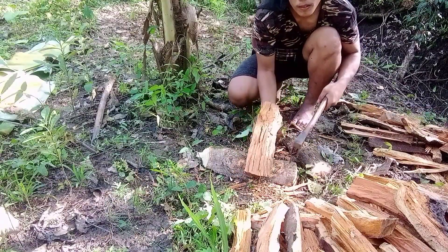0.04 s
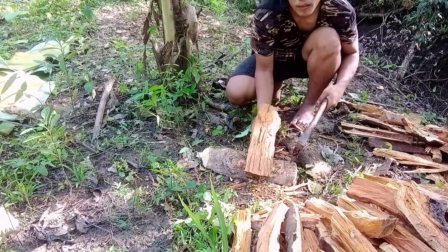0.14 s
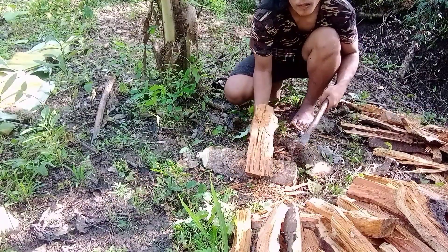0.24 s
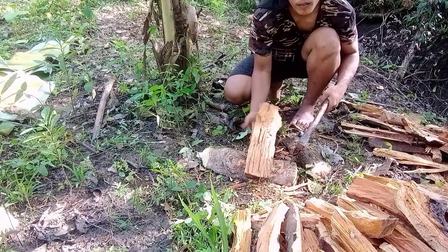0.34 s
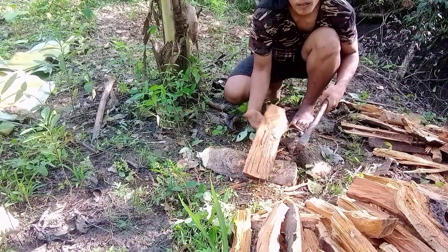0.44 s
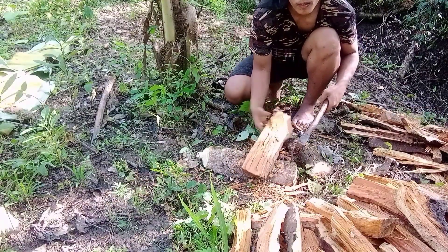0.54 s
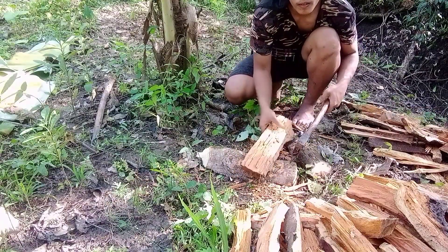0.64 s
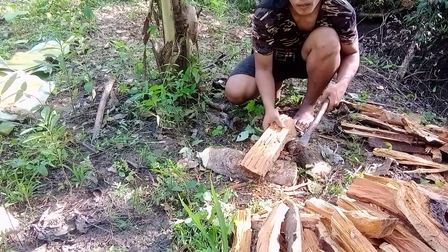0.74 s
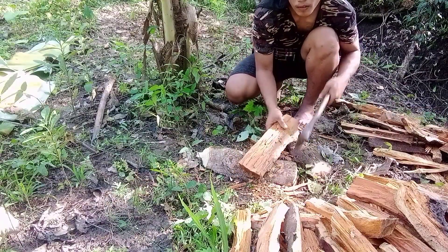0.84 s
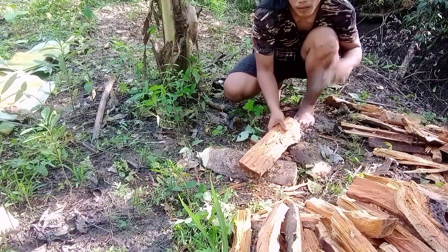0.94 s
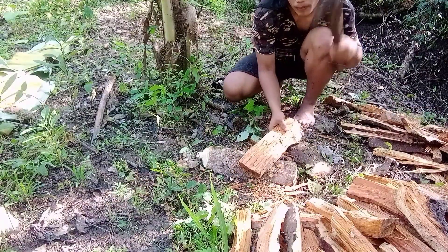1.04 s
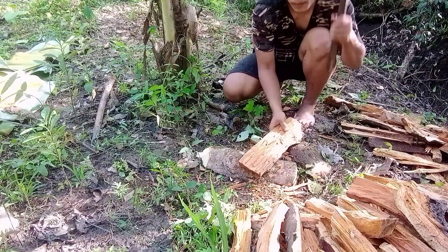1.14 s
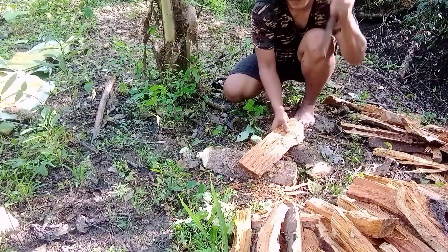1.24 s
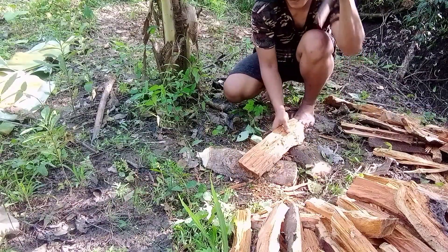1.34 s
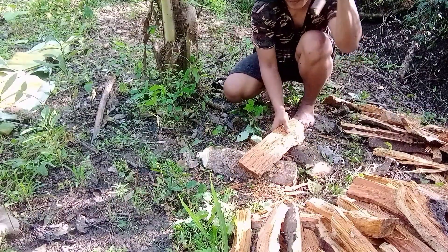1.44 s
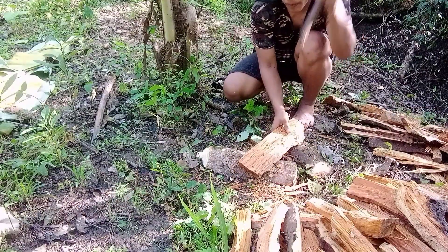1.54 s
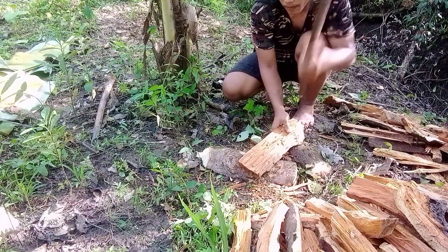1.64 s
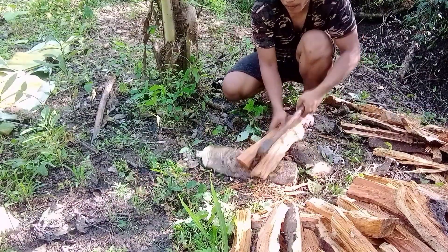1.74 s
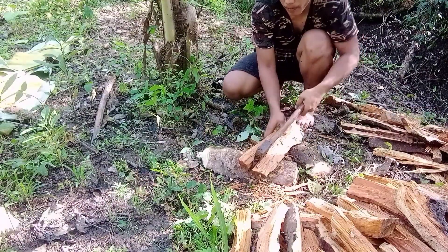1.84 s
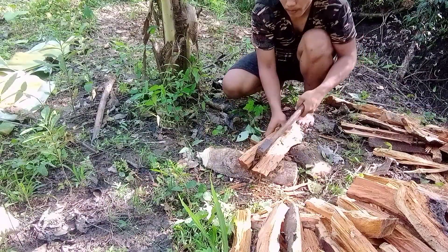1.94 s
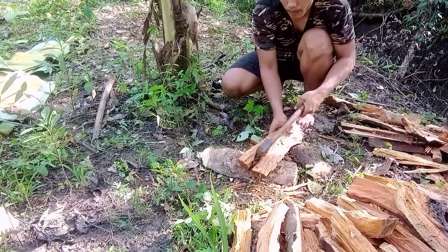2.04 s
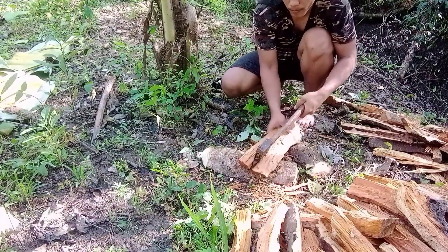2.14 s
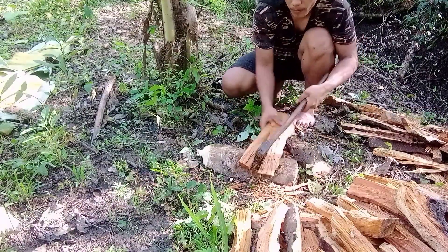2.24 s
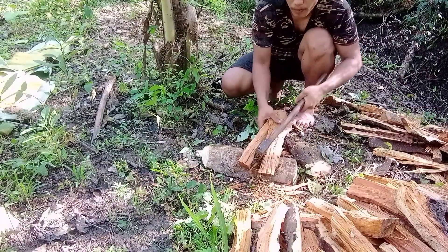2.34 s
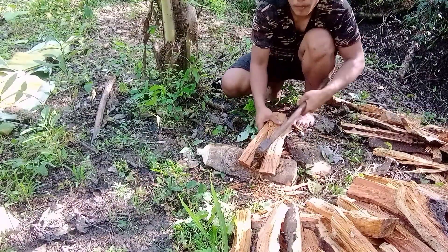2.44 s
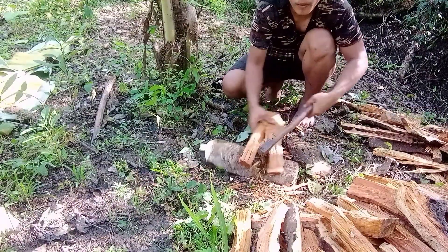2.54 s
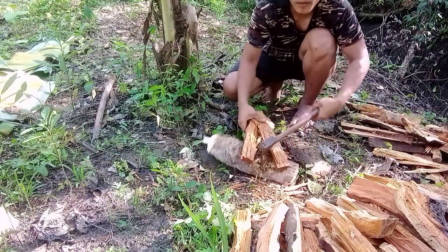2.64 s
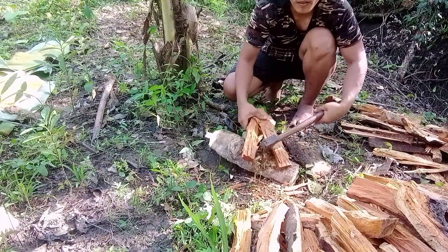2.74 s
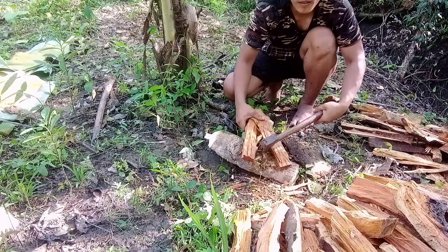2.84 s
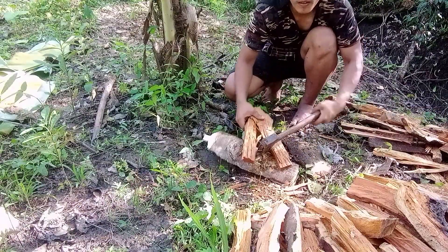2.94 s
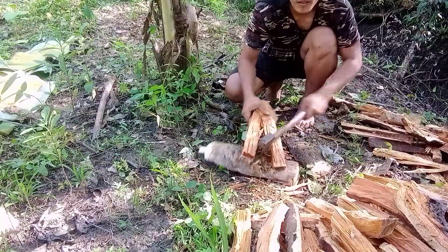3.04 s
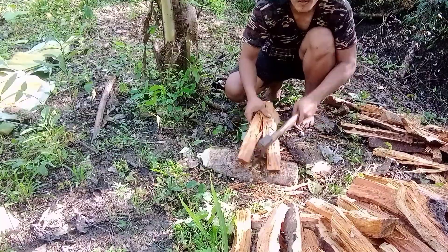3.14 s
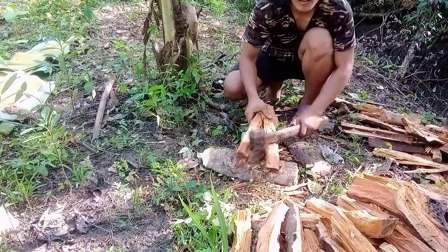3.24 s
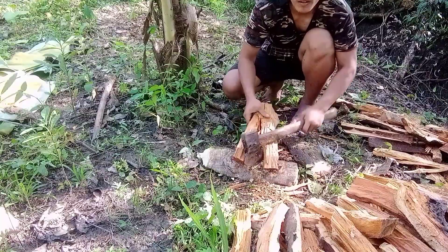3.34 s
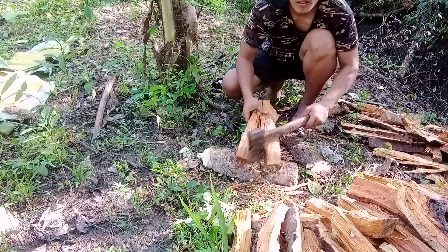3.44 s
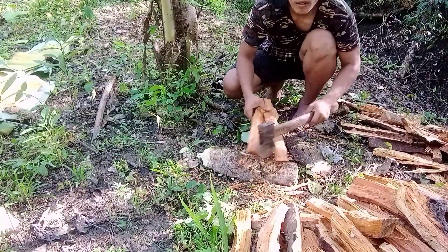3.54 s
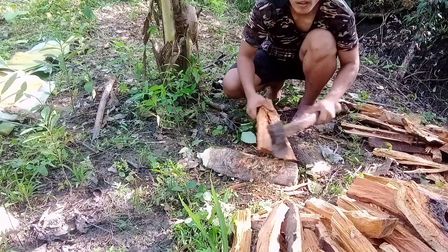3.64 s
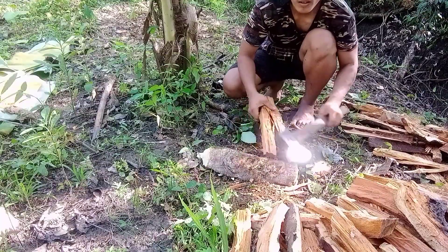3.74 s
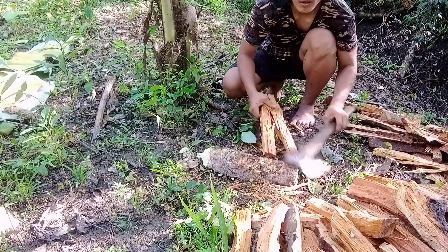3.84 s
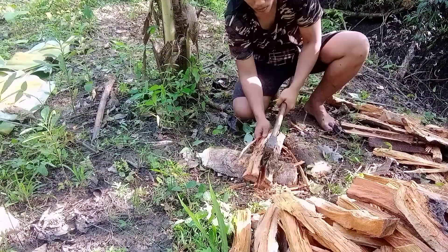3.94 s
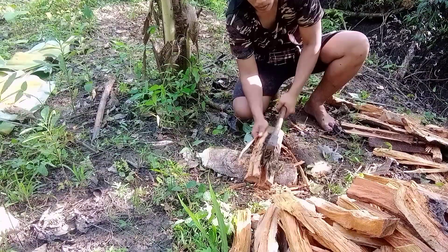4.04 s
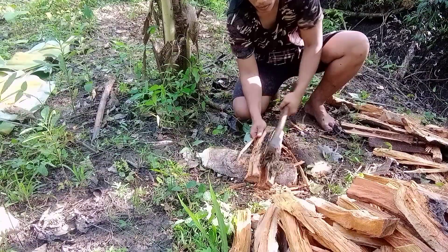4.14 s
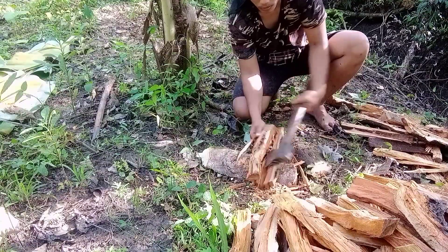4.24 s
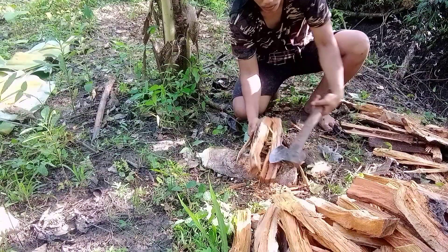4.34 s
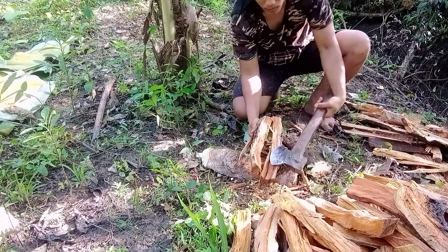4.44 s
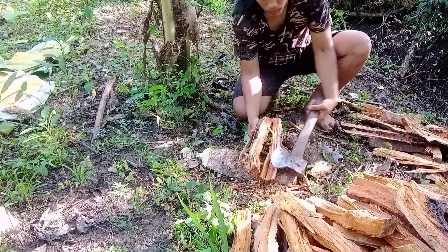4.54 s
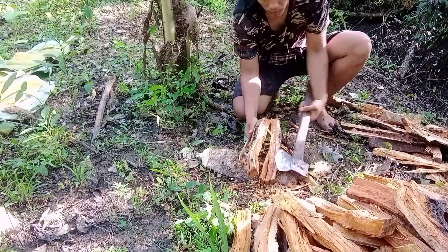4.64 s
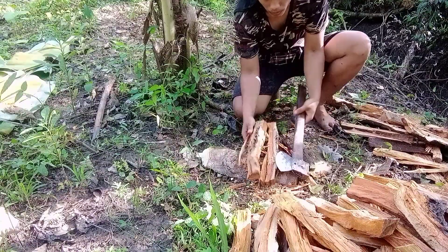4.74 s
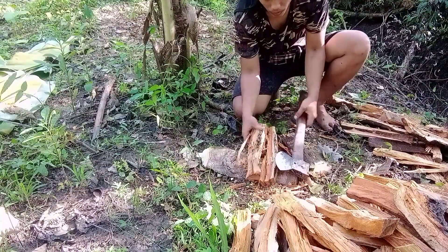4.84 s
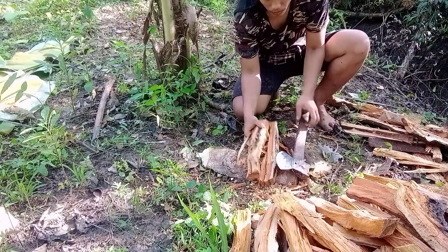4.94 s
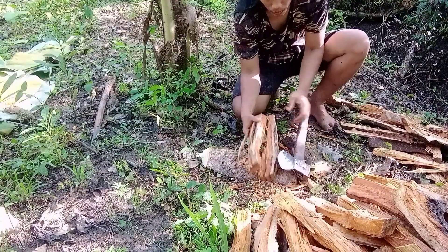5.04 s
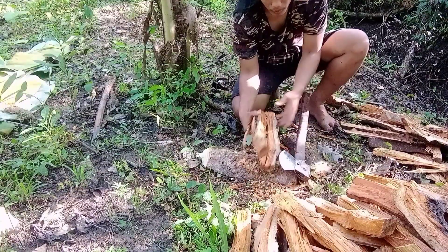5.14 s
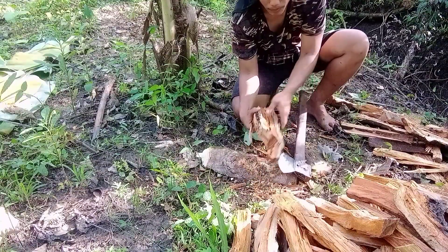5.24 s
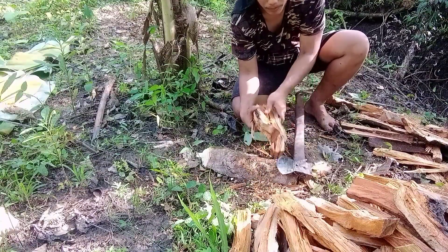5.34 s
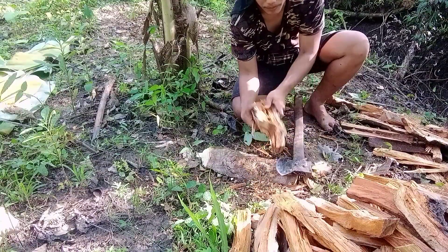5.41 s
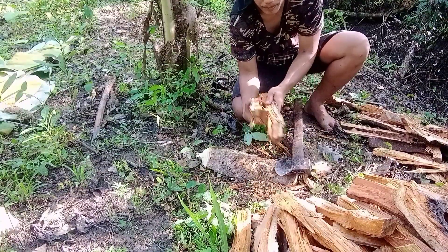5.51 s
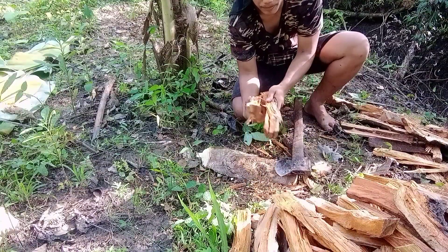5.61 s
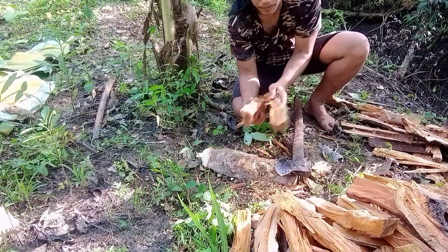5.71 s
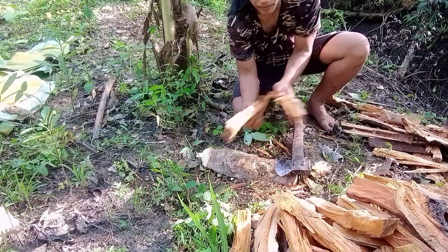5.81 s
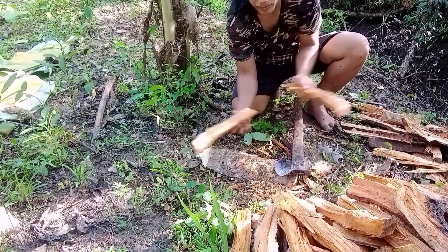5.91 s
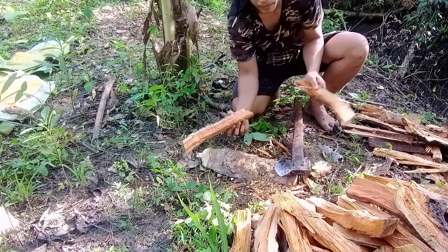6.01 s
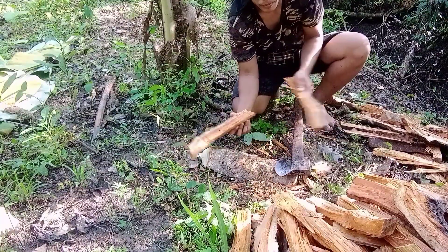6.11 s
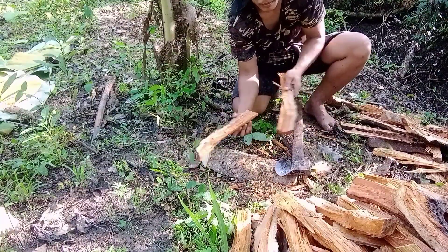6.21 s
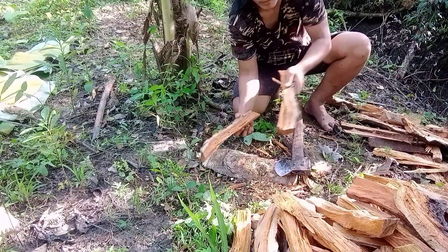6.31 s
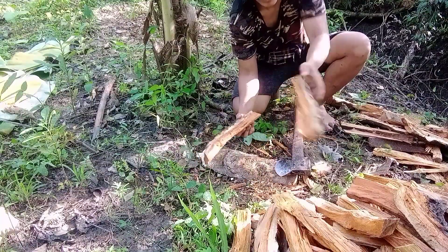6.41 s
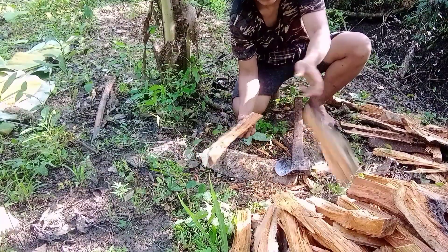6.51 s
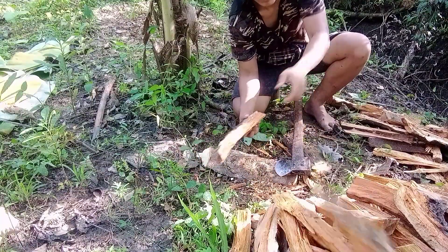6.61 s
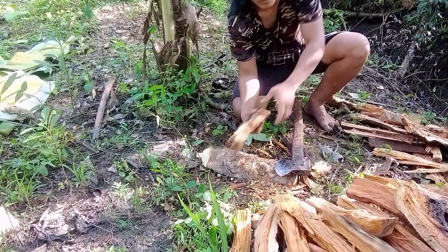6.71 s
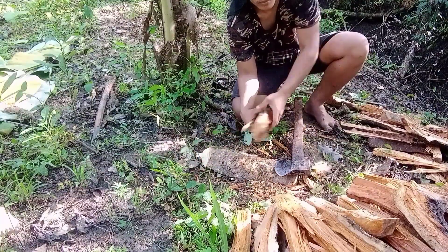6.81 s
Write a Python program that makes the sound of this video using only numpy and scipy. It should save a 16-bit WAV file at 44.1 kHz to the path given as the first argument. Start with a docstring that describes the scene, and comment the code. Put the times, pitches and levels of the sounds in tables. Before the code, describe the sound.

A clearing among trees, with the microphone close to the wood. Crickets and cicadas keep a thin high drone with pulsing trills and chirps over faint low rumble and hiss. In the first second there is light rubbing, a soft thump, short gliding whistles from a far bird, and distant chops with an airy echo at about 0.7 and 1.6. At 1.8 one loud, dry axe blow cracks into the wood, with a short echo. A small snap follows at 2.1, then dense splintering and tearing from 2.3 to 3.3, ending in woody knocks. Another distant chop comes at 3.5. More fibres crackle and rip from 4.1 to 4.45. The axe head settles with faint clinks at 4.75 and 5.0. Quiet rustles and small ticks follow, a light knock at 5.9, then a sharp bright clack as a piece lands on the pile at 6.74.

```python
"""Splitting firewood among trees

Near the microphone a small axe splits firewood on a log: one hard chop, tearing fibres, knocks, the axe head
set down, a piece tossed on the pile. Breaks and rubbing are shaped noise; knocks and steel are damped sines.
Someone farther off chops too, mostly heard as echo: noise tails that die away between the trunks.
Crickets and cicadas drone as pulsed tones and coloured noise, a far bird whistles in gliding sines,
and low rumble and faint hiss lie underneath."""
import sys
import numpy as np
from scipy import signal
from scipy.fft import rfft, irfft, next_fast_len
from scipy.io import wavfile
from scipy.ndimage import uniform_filter1d, map_coordinates

SR = 44100
rng = np.random.default_rng(int(sys.argv[2]) if len(sys.argv) > 2 else 0)


def volts_from_db(level):
    """Convert decibel levels to linear amplitude ratios."""
    exponent = np.asarray(level, float) / 20
    return 10 ** exponent


def persist_wave(psi):
    """Save psi, clipped to +-1, as 16-bit WAV."""
    counts = np.round(np.clip(psi, -1, 1) * 32767).astype(np.int16)
    wavfile.write(sys.argv[1], SR, np.atleast_2d(counts).T)


N = 302967
T = np.arange(N) / SR

# echo among the trees: (frequency [Hz], time to fall 60 dB before any stretching [s])
TREE_DECAY = [(150, 0.43), (1000, 0.53), (4000, 0.52), (9000, .4), (15000, 0.15)]
# far chops: (time [s], level [dB], echo relative to it [dB], brightness [dB per octave])
FAR_CHOPS = [(0.673, -30.5, -3, -2.06), (1.649, -34.5, -2, 0.1), (3.523, -26, -7.5, 1.9),
             (3.94, -56, 2, 1.5)]
# a far chop still echoing at the start: (time before the start [s], level [dB], echo [dB], brightness [dB per octave])
EARLIER_CHOP = (.2, -26.5, 1.5, -2)
# spectrum of far chops before brightness: (frequency [Hz], relative level [dB])
FAR_COLOUR = [(88, -33), (150, 1), (303, -26.5), (398, -15), (466, -5.5), (649, -4.5), (1140, -4),
              (4160, -7), (6910, -6.5), (16000, -42.5)]
# cicada chorus: (time [s], cicada level [dB], low cicada level [dB])
CHORUS_LEVEL = [(0.0, -70, -83), (0.15, -71, -84), (0.52, -71, -94), (0.86, -72.5, -95), (0.99, -69, -99),
                (1.26, -68, -112.5), (1.55, -68, -103), (1.68, -73.5, -91), (1.84, -65.5, -78),
                (2.31, -69, -72.5), (2.58, -65.5, -93), (2.7, -61.5, -80), (2.85, -69, -80),
                (3.06, -67.5, -81), (3.19, -74, -75.5), (3.33, -72, -79), (3.56, -71, -82),
                (3.71, -69, -78), (3.94, -75, -83.5), (4.15, -68.5, -91), (4.3, -69, -69), (4.53, -70, -84),
                (4.69, -66, -80), (4.97, -69, -79.5), (5.36, -69, -79), (5.74, -66, -76),
                (5.89, -69.5, -75.5), (6.08, -69.5, -86), (6.28, -71, -87), (6.5, -71.5, -80.5),
                (6.87, -71, -90.5)]
# spectrum of the cicadas: (frequency [Hz], relative level [dB])
CICADA_COLOUR = [(4300, -58), (5100, -24), (5500, -6), (5900, 3), (6500, -6), (7050, -18.5), (7500, -12),
                 (8000, -15.5), (8350, -10.5), (8750, -15), (9150, -42), (11000, -79.5)]
# spectrum of the low cicadas: (frequency [Hz], relative level [dB])
LOW_CICADA_COLOUR = [(4100, -50), (4450, -6), (4800, 0), (5300, -3), (5800, -19.5), (6500, -60)]
# phrases of the trilling cricket: (time [s], level [dB])
TRILL_LEVEL = [(0, -70), (.15, -72), (.22, -84), (.8, -87.5), (.95, -70), (1.62, -72), (1.75, -79),
               (2.4, -82), (2.5, -71), (3.55, -71), (3.75, -76), (3.9, -87), (4.3, -82), (4.45, -69.5),
               (4.85, -76.5), (4.95, -84), (5.3, -89), (5.42, -70), (6.1, -72), (6.87, -68)]
# distant rumble: (time [s], relative level [dB])
RUMBLE_LEVEL = [(0.0, -79), (0.38, -81), (0.63, -81.5), (0.86, -75.5), (1.03, -75.5), (1.2, -78.5),
                (1.49, -74.5), (1.68, -76), (1.82, -69), (1.87, -67), (2.35, -75.5), (2.62, -82),
                (2.79, -71.5), (2.93, -78), (3.52, -80.5), (3.67, -71.5), (4.0, -81), (4.32, -77.5),
                (4.75, -82), (5.24, -82), (5.45, -82.5), (6.05, -86.5), (6.79, -80), (6.87, -91)]
# spectrum of the rumble: (frequency [Hz], relative level [dB])
RUMBLE_COLOUR = [(20, -29.5), (40, -8), (100, 0), (200, -10), (330, -23), (600, -60)]
# spectrum of the faint hiss: (frequency [Hz], relative level [dB])
HISS_COLOUR = [(100, -28.5), (300, 3), (1000, -3.5), (4000, -8), (9000, -6), (11000, -21.5), (16000, -15.5)]
# higher crickets: (middle [s], pitch [Hz], length [s], relative level [dB])
PEEPS = [(0.059, 8470, 0.028, -71.5), (0.146, 8590, 0.11, -80), (0.475, 8520, 0.043, -76.5),
         (0.605, 8620, 0.14, -80), (0.928, 8470, 0.11, -78), (1.05, 8620, .07, -79.5),
         (1.12, 8600, 0.025, -85), (1.162, 8440, 0.041, -86), (1.287, 8900, 0.03, -87),
         (1.31, 8400, 0.082, -83), (1.337, 8520, 0.028, -73.5), (1.357, 8750, 0.034, -88),
         (1.504, 8650, 0.059, -79), (2.146, 8330, 0.12, -80.5), (2.43, 8550, 0.079, -82),
         (2.907, 8620, 0.083, -81), (3.346, 8650, 0.078, -82), (3.862, 8320, .06, -87),
         (4.021, 8620, 0.093, -78.5), (4.27, 8400, .05, -88), (4.534, 8540, .05, -80.5),
         (4.726, 8520, 0.044, -75), (4.968, 8610, 0.055, -79), (5.136, 8660, 0.067, -79.5),
         (5.376, 8560, 0.039, -78.5), (5.53, 8650, 0.035, -75.5), (5.804, 8500, 0.04, -76),
         (5.971, 8370, .06, -81.5), (6.005, 8800, 0.038, -90.5), (6.221, 8570, 0.033, -76.5),
         (6.3, 8600, 0.12, -84), (6.424, 8440, 0.041, -81.5), (6.65, 8600, 0.049, -79.5),
         (6.706, 8900, .05, -91)]
# hands, bark and tearing fibres, one list a stretch: (time [s], relative scrape level [dB], relative leaf level [dB])
RUSTLE_LEVELS = [
    [(0.05, -79, -96), (0.136, -79, -116), (0.2, -87, -98)],
    [(0.31, -82, -99), (0.42, -87, -99)],
    [(0.84, -79, -99), (1.008, -92, -100), (1.1, -101, -100)],
    [(2.2, -84.5, -97), (2.356, -78.5, -94.5), (2.492, -91, -92), (2.576, -72.5, -89), (2.69, -72, -81),
     (2.728, -78, -84), (2.85, -85, -90), (2.92, -87, -99), (3.066, -79, -88), (3.178, -71.5, -90.5),
     (3.216, -67.5, -93), (3.31, -76, -100), (3.352, -96, -102), (3.45, -113, -93)],
    [(4.05, -97, -105.5), (4.154, -64, -99), (4.28, -75.5, -94), (4.33, -69.5, -78), (4.446, -62, -91),
     (4.524, -82, -106), (4.748, -94, -105), (4.974, -91.5, -99), (5.2, -88.5, -102)],
    [(5.45, -98, -99), (5.57, -89, -99), (5.69, -105, -95), (5.786, -91, -91.5), (5.94, -88, -94),
     (6.0, -113, -99)],
    [(6.26, -91, -101), (6.4, -101, -100), (6.54, -95, -100)],
    [(6.72, -89.5, -100), (6.87, -94.5, -99)],
]
# spectrum of the scrape: (frequency [Hz], relative level [dB])
SCRAPE_COLOUR = [(180, -93), (300, -69), (689, -23), (978, -2), (1300, -12.5), (1840, -6), (3950, -7.5),
                 (6850, -5), (16000, -29)]
# spectrum of the dry leaves: (frequency [Hz], relative level [dB])
LEAF_COLOUR = [(4000, -22), (6500, -3), (9000, 3), (12000, -8.5), (16000, 2)]
# bouts of the chirping cricket: (middle of first chirp [s], chirps [count], period [s], level [dB])
BOUTS = [(.13, 5, 0.17, -79.5), (0.939, 5, .163, -69), (2.157, 7, 0.18, -65), (3.895, 1, 0.21, -63),
         (4.554, 10, .164, -65), (6.234, 3, 0.18, -74)]
# near breaks: (time [s], snap level [dB], then relative to it knock [dB], treble [dB], air [dB]; 30 dB fall [ms])
CRACKS = [(0.1027, -57.5, -6, -8, -30, 14), (0.1526, -55, -1, 1, -27, 8), (0.955, -51, -3, -10, -26, 5),
          (1.8238, -10, -17, -9, -24.5, 14), (2.0672, -40, -22, -10.5, -38, 9.1),
          (2.286, -57, -24, -0.5, -22, 10), (2.2999, -63.5, -15, 6, -14, 10.4),
          (2.3271, -42, -28.5, 1, -9, 7), (2.3462, -47, -27, -2, -12, 9.4),
          (2.3908, -57, -28, 1.5, -18, 7.4), (2.5148, -49.5, -33, -3, -17, 8),
          (2.5535, -28, -36, -6.5, -22, 4.7), (2.567, -30, -28.5, -14, -26, 6.7),
          (2.5819, -37.5, -25, -4.5, -19, 12.5), (2.611, -28.5, -23.5, -8, -31, 13),
          (2.6196, -32.5, -17.5, -4, -14, 8.5), (2.625, -35, -18, -6.5, -17, 14.5),
          (2.6377, -31.5, -8.5, 0, -21, 8.6), (2.641, -22.5, -27.5, -8.5, -32, 13.4),
          (2.6695, -34, -22, -11, -20, 8), (2.6761, -52.5, -9, 9.5, -11, 13),
          (2.6967, -35, -23, -5, -20, 12.5), (2.7174, -51, -8.5, -8.5, -16, 17),
          (2.7585, -36.5, -22, -6.5, -20, 7.6), (2.8194, -59.5, -14, 6, -3, 8),
          (2.866, -64, -7, 5, -1, 9.9), (2.9706, -72.5, -15, 18, -2, 8.7), (3.021, -45, -27, 1.5, -6, 8),
          (3.0875, -29.5, -28, -4.5, -17.5, 11.5), (3.1241, -58, -6, -3, -22, 9.3),
          (3.1394, -51, -7, -15, -22, 7.4), (3.1807, -40, -5.5, -22, -24, 3.5),
          (3.2218, -42, -12, -16, -37, 5), (3.2263, -39, -14.5, -9.5, -39, 13.3),
          (3.2344, -54, 2.5, -6, -33, 6.6), (3.281, -47.5, -7.5, -11, -36, 11),
          (3.3356, -47.5, -13, -15, -40, 20), (4.077, -83.5, -4.5, 26.5, -12, 6.5),
          (4.106, -54, -6, -12, -28, 7.5), (4.111, -45, -25, -3.5, -28.5, 10.2),
          (4.1245, -49.5, -20, -4, -27.5, 12.7), (4.144, -43, -16, -11, -25, 24),
          (4.1678, -36.5, -36, -10, -37, 12.5), (4.1712, -51, -16, -2, -19, 9.4),
          (4.1763, -34.5, -18, -6, -32, 10), (4.1814, -44, -23, -2, -14, 5.5),
          (4.2005, -44, -27, -13.5, -23, 9.1), (4.2228, -54, -30, -14, -24, 8),
          (4.25, -51, -9, -22, -32, 24), (4.2581, -58, -2, -17, -27, 12), (4.272, -68, -6.5, 7, -19, 8),
          (4.2996, -38.5, -50, 3.5, -11, 6.1), (4.3099, -51.5, -42, 8, -9, 8.6),
          (4.3257, -39, -43, 0, -12, 7.7), (4.3279, -44.5, -33, 3, -7, 9.5),
          (4.3334, -53, -35, -1, -3, 6.6), (4.339, -61, -28, 9, 14, 8), (4.3474, -57, -26, 19.5, 13, 5.1),
          (4.355, -39, -55, -17, -10, 15), (4.3794, -51, -16, 12, -2, 3.3), (4.3835, -45, -30, 8.5, -16, 9),
          (4.4146, -59, -28, 3, -8, 9), (4.4319, -53, -33, 4.5, -11.5, 7.3),
          (4.4396, -46.5, -35, 3, -11, 8), (4.596, -53.5, -41, -4, -24.5, 13),
          (4.7276, -59.5, 2, 2, -17, 7.2), (4.7328, -50, -20, -7, -24.5, 12.4),
          (4.9299, -76, -21, 11, -21, 7.7), (5.1532, -59.5, -20, -9, -9, 5.8),
          (5.187, -81, -17, 17.5, -10, 8), (5.3229, -61.5, -18.5, -6, -23, 6.9),
          (5.5503, -55.5, -29, 5.5, -1.5, 8.9), (5.5667, -44, -33, -8, -14, 17),
          (5.58, -47.5, -27, -3, -13.5, 10.6), (5.7594, -80, -25, 13, -1, 8),
          (5.8104, -82, -19, 5, 16, 7.8), (5.8323, -77, -22, 26.5, 18.5, 9.5),
          (5.8484, -66, -26, 16, 7.5, 8.2), (5.898, -45.5, -22, 0, -18, 6.9),
          (5.9026, -46.5, -23, 0, -16.5, 15), (6.3029, -58.5, -26, -3.5, -19, 7.9),
          (6.3243, -59, -28.5, 6, -12, 6.9), (6.4994, -74.5, -14, 10, -21, 9.2),
          (6.7365, -24, -10.5, -3, -17, 4), (6.7421, -27.5, -11, -6.5, -30, 12.4),
          (6.7486, -15.5, -24, -7, -35, 4.7), (6.7612, -44, -17, -16, -25, 8.7),
          (6.7904, -49.5, -2, -2, -18, 6.2), (6.7951, -55, -12, 14.5, -6, 6),
          (6.8195, -53, -17, 5, -4, 8.7), (6.8603, -54, -26, 8, 1, 3.9)]
# resonances of split wood: (centre [Hz], width [Hz], relative level [dB])
WOOD_RESONANCES = [(306, 270, -9.5), (725, 160, 1), (1050, 90, -1), (1512, 340, -1.5)]
# swings of a log or a loose piece: (time [s], level [dB], pitch [Hz], time to fall 60 dB [s])
KNOCKS = [(0.15, -37, 91, 0.098), (.152, -41.5, 410, 0.012), (0.677, -33, 137, 0.019),
          (1.656, -40, 97, 0.04), (1.825, -9, 1344, 0.019), (1.825, -24, 6660, 0.019),
          (1.8275, -21, 1010, 0.023), (1.8311, -4, 323, 0.0093), (1.833, -20.5, 148, 0.049),
          (2.631, -42, 100.4, .05), (3.124, -48.5, 910, 0.032), (3.136, -48, 353, 0.11),
          (3.18, -50, 756, 0.044), (3.221, -45.5, 947, 0.093), (3.281, -44, 648, 0.045),
          (3.282, -48.5, 262, 0.068), (3.337, -44, 1520, 0.033), (3.334, -49, 219, 0.079),
          (3.528, -42.5, 130, 0.06), (4.105, -52.5, 924, 0.039), (4.145, -47, 2400, 0.021),
          (4.176, -39.5, 1074, 0.015), (4.356, -43, 2040, 0.023), (4.25, -58, 798, 0.12),
          (4.733, -52, 80, .056), (4.738, -58, 223, 0.18), (4.81, -62.5, 1330, 0.02),
          (4.93, -72.5, 1800, .03), (5.14, -62.5, 2750, 0.027), (5.145, -73, 1850, 0.028),
          (5.901, -53, 1136, 0.018), (5.029, -54, 76, 0.11), (5.613, -65, 199, 0.035),
          (5.709, -70, 1544, 0.073), (5.821, -71, 2030, 0.11), (6.742, -23.5, 2550, 0.013),
          (6.7485, -10.5, 3475, 0.013), (6.7497, -24.5, 1062, 0.041), (6.763, -34.5, 3640, .02),
          (6.791, -43.5, 714, 0.087)]
# far bird notes: (time [s], nominal start pitch [Hz], nominal end pitch [Hz], length [s], relative level [dB])
BIRD_NOTES = [(0.199, 1536, 1964, 0.052, -69.5), (.225, 2130, 2150, 0.041, -75),
              (0.301, 2460, 2710, 0.056, -75.5), (0.491, 2420, 2180, 0.015, -63.5),
              (0.494, 1945, 1770, 0.023, -69.5), (0.498, 2980, 2930, 0.074, -82),
              (0.567, 1845, 1510, 0.035, -69.5), (.6, 1806, 1840, 0.02, -64.5),
              (0.894, 1920, 1800, 0.024, -74), (0.968, 1720, 1555, .03, -70.5),
              (.995, 1807, 1860, 0.023, -65), (1.061, 2310, 2460, 0.016, -68),
              (1.089, 2643, 2466, 0.023, -67), (5.367, 2363, 2440, 0.032, -86),
              (5.376, 3044, 3080, 0.027, -87), (5.534, 2610, 2740, 0.037, -76)]
# axe head on the log: (time [s], relative level [dB])
CLINKS = [(4.7405, -52.5), (4.7618, -49), (5.027, -49.5)]
# ringing modes of the axe head: (pitch [Hz], average relative level [dB], time to fall 60 dB [s])
STEEL_MODES = [(1560, -2.5, 0.069), (2286, 2.5, 0.051), (3160, 4.5, 0.042), (4180, -2, 0.035),
               (1000, -18.5, 0.036), (2650, -11, .035)]
# microphone port peaks, added to the flat response: (centre [Hz], width [Hz], level of the added part [dB])
MIC_PEAKS = [(6400, 900, -3), (14900, 1200, 7)]


def unit(x):
    """Scale to rms 1."""
    return x / np.sqrt(np.mean(x ** 2) + 1e-20)


def along(points, hz):
    """Read (Hz, value) points on a log frequency axis."""
    f, v = np.transpose(points)
    return np.interp(np.log(hz + 1), np.log(f + 1), v)


def curves(rows, outside=None):
    """One value per sample for each column after the time."""
    s, *columns = np.transpose(rows)
    return [np.interp(T, s, column, outside, outside) for column in columns]


def wobble(rate):
    """A smooth random curve with rate knots a second."""
    knots = rng.standard_normal(int(N * rate / SR) + 4)
    return map_coordinates(knots, [T * rate])


def rough(size, radians):
    """Slow random phase: wood and distance blur a pure ring."""
    return radians * unit(uniform_filter1d(rng.standard_normal(size), 160))


def patchy(depth_db):
    """Noise whose level varies in patches of time and frequency."""
    z = signal.stft(rng.standard_normal(N), nperseg=512)[2]
    field = uniform_filter1d(rng.standard_normal(z.shape), 4, 0)
    field = uniform_filter1d(field, 8, 1)
    return signal.istft(z * volts_from_db(depth_db * unit(field)), nperseg=512)[1][:N]


def filtered(x, response):
    """Filter x by a complex response of frequency."""
    m = next_fast_len(len(x) + 8192)
    return irfft(rfft(x, m) * response(np.fft.rfftfreq(m, 1 / SR)), m)[:len(x)]


def coloured(x, spectrum):
    """Shape x by (Hz, dB) points and scale to rms 1."""
    return unit(filtered(x, lambda hz: volts_from_db(along(spectrum, hz))))


def resonances(peaks):
    """Causal response of (Hz, width, dB) peaks with alternating signs."""
    def response(f):
        total = 0
        for k, (centre, width, db) in enumerate(peaks):
            damping = 1j * f * width
            total = total + (-1) ** k * volts_from_db(db) * damping / (centre ** 2 - f ** 2 + damping)
        return total
    return response


def band(x, lo_hz, hi_hz):
    """Steep causal band-pass that keeps the rms of white noise."""
    sos = signal.butter(3, [lo_hz, hi_hz], "band", fs=SR, output="sos")
    return signal.sosfilt(sos, x) * np.sqrt(SR / 2 / (hi_hz - lo_hz))


def add(track, s, sound):
    """Mix a sound in at a time in seconds."""
    part = track[..., round(s * SR):][..., :sound.shape[-1]]
    part += sound[..., :part.shape[-1]]


def pulses(rate, duty, s=0.0):
    """Wing strokes: a train of rounded bumps."""
    return np.clip((np.cos(2 * np.pi * rate * (T - s)) - 1) / (2 * duty) + 1, 0, 1)


def narrow(hz, width_hz):
    """Noise squeezed twice through one resonance, rms 1."""
    resonance = resonances([(hz, width_hz, 0)])
    return unit(filtered(rng.standard_normal(N), lambda f: resonance(f) ** 2))


def gate(middle, length):
    """A soft-edged window."""
    out = np.zeros(N)
    near = slice(max(round((middle - length) * SR), 0), round((middle + length) * SR))
    out[near] = np.exp(-((T[near] - middle) / (length / 2)) ** 4)
    return out


def trees(x, slower=1.0):
    """Trunks and leaves scatter the sound back; each third of a second gets a new decaying noise tail."""
    out, step, size = np.zeros(len(x) + 2 * SR), SR // 3, SR * 3 // 4
    for start in range(0, len(x), step):
        stretch = x[start:start + step]
        if stretch.any():
            hz, t, z = signal.stft(rng.standard_normal(size), SR, nperseg=256)
            trunks_db = 6 * uniform_filter1d(rng.standard_normal(z.shape), 5, 0)  # single trunks answer in patches
            decay_db = -60 * t / (slower * along(TREE_DECAY, hz)[:, None])
            tail = signal.istft(z * volts_from_db(trunks_db + decay_db), SR, nperseg=256)[1]
            tail *= 1 - np.exp(-np.arange(len(tail)) / SR / .004)  # no scatterer is very close
            add(out, start / SR, signal.fftconvolve(stretch, tail / np.linalg.norm(tail)))
    return out[:len(x)]


def far_chops():
    """A far blow arrives as a brief crack of noise, then a long wash from the trees."""
    out, t = np.zeros(N + SR), np.arange(SR // 4) / SR  # one second of lead-in, cut off at the end
    fall = volts_from_db(-30 * t / .012)  # the direct crack falls 30 dB in 12 ms
    earlier = (-EARLIER_CHOP[0], *EARLIER_CHOP[1:])
    for s, db, echo_db, tilt_db in [earlier] + list(FAR_CHOPS):
        colour = [(hz, level + tilt_db * np.log2(hz / 2000)) for hz, level in FAR_COLOUR]
        direct = coloured(rng.standard_normal(len(t)), colour) * fall
        click = coloured(signal.unit_impulse(len(t), 400), colour)[300:]
        echo = trees(np.pad(click, (0, SR // 2)), slower=1.2)
        add(out, s + 1, volts_from_db(db - 9) * direct)
        add(out, s + 1, volts_from_db(db + echo_db - 23.5) * echo)
    return out[SR:]


def cicadas():
    """Many cicadas blur into two bands of patchy noise that swell and sink."""
    high_db, low_db = curves(CHORUS_LEVEL)
    high = volts_from_db(high_db) * coloured(patchy(depth_db=2.0), CICADA_COLOUR)
    low = volts_from_db(low_db + 1.5 * wobble(8)) * coloured(patchy(depth_db=3), LOW_CICADA_COLOUR)
    return high + low


def trilling_cricket():
    """A wing rings as an unsteady tone with narrow noise, pulsed by its strokes."""
    trill_db, = curves(TRILL_LEVEL)
    wing = np.sin(2 * np.pi * 7660 * T + 1.3 * wobble(110)) + .5 * narrow(7650, 200)
    strokes = .6 + pulses(53, 1, .004 * wobble(9))  # stroke times drift by milliseconds
    return volts_from_db(trill_db + 1.5 * wobble(25)) * unit(wing * strokes)


def rumble():
    """Low distant noise that rolls a little."""
    rolling_db = 2.5 * wobble(6)
    return volts_from_db(curves(RUMBLE_LEVEL)[0] + 3 + rolling_db) * coloured(rng.standard_normal(N), RUMBLE_COLOUR)


def hiss():
    """The faint hiss of the open air: patchy coloured noise."""
    return volts_from_db(-87.5) * coloured(patchy(depth_db=2.5), HISS_COLOUR)


def peeping_crickets():
    """Higher crickets give short soft-edged tones, pulsed by wing strokes."""
    out = np.zeros(N)
    for s, hz, length, db in PEEPS:
        t = np.arange(-length, length, 1 / SR)
        strokes = 1 - 0.45 * np.cos(2 * np.pi * 30 * t)
        envelope = volts_from_db(db + 7.5) * np.exp(-(2 * t / length) ** 4)
        add(out, max(s - length, 0), envelope * strokes * np.sin(2 * np.pi * hz * t))
    return out


def rustle():
    """Clumped tiny fibre snaps on a bed of rubbing noise, and a finer crackle of dry leaves."""
    scrape, leaves = sum(volts_from_db(np.array(curves(rows, -140))) for rows in RUSTLE_LEVELS)
    hits = rng.random((2, N)) < 1200 / SR  # about 1200 snaps a second
    snap_db = 4 * rng.exponential(size=(2, N)).clip(0, 3)
    snaps = hits * rng.standard_normal((2, N)) * volts_from_db(snap_db)
    rubbing = coloured(.7 * unit(snaps[0]) + patchy(depth_db=6.0), SCRAPE_COLOUR)
    crackle = coloured(0.59 * unit(snaps[1]) + rng.standard_normal(N), LEAF_COLOUR)
    clumps = volts_from_db(3.5 * np.array([wobble(45), wobble(60)]))
    return volts_from_db(3) * clumps[0] * scrape * rubbing + volts_from_db(2) * clumps[1] * leaves * crackle


def chirping_cricket():
    """One cricket chirps in bouts: narrow noise, pulsed by wing strokes and gated."""
    chirps = np.zeros(N)
    for s, count, period, db in BOUTS:
        for k in range(round(count)):
            chirps += volts_from_db(db) * gate(s + k * period, 0.07)
    return chirps * unit(narrow(5960, 310) * (0.9 + pulses(90, 0.76)))


def cracks():
    """Each break is a short noise burst whose low part rings the wood; the trees return its smooth colour."""
    bursts, impulses, t = np.zeros((4, N)), np.zeros((4, N)), np.arange(2048) / SR
    for s, db, knock_db, treble_db, air_db, life_ms in CRACKS:
        shape = volts_from_db(-30 * t / (max(life_ms, 1) / 1000)) * (1 - np.exp(-t / 0.0006))
        shape *= 1 + 1.6 * np.exp(-t / .0007)  # the first fibre to go is the sharpest
        gains = volts_from_db(db + np.array([[knock_db], [-7], [treble_db], [air_db]]))
        add(bursts, s, gains * shape * rng.standard_normal(len(t)))
        add(impulses, s, gains * np.linalg.norm(shape) * rng.choice([-1, 1]))  # the same energy as one impulse
    edges = [(250, 1900), (1900, 5000), (5000, 9300), (9300, 16500)]  # knock, middle, treble, air [Hz]
    direct = [band(track, *hz) for track, hz in zip(bursts, edges)]
    scattered = [band(track, *hz) for track, hz in zip(impulses, edges)]
    direct = 2.33 * filtered(direct[0], resonances(WOOD_RESONANCES)) + sum(direct[1:])
    scattered = 1.8 * scattered[0] + sum(scattered[1:])
    return direct, scattered


def knocks():
    """A struck log or loose piece swings at one pitch and is damped."""
    out, t = np.zeros(N), np.arange(SR // 4) / SR
    for s, db, hz, t60 in KNOCKS:
        blur = np.minimum(t * hz / 8, 1) * rough(len(t), 1.1)  # sets in over eight cycles
        swing = np.sin(2 * np.pi * hz * t + blur)
        onset = 1 - np.exp(-t * hz * 5.8)
        add(out, s, volts_from_db(db - 60 * t / max(t60, .005)) * swing * onset)
    return out


def bird():
    """A far bird gives short unsteady gliding whistles, and the trees echo them."""
    out = np.zeros(N)
    for s, from_hz, to_hz, length, db in BIRD_NOTES:
        u = np.linspace(0, 1, round(length * SR))
        warble = 1 + 0.032 * np.sin(2 * np.pi * (1.6 * u + rng.random()))
        phase = 2 * np.pi * np.cumsum((from_hz + (to_hz - from_hz) * u) * warble) / SR
        add(out, s, volts_from_db(db + 2.5) * np.sin(np.pi * u) * np.sin(phase + rough(len(u), 0.4)))
    return out + volts_from_db(-2.5) * trees(out, slower=.9)


def clinks():
    """The axe head rings briefly in several damped modes, at new strengths each time."""
    out, t = np.zeros(N), np.arange(SR // 5) / SR
    for s, db in CLINKS:
        ring = np.zeros(len(t))
        for hz, level, t60 in STEEL_MODES:
            fall = volts_from_db(level + rng.normal(0, 3) - 60 * t / t60)
            ring += fall * np.sin(2 * np.pi * hz * t + rough(len(t), .8))
        add(out, s, volts_from_db(db - 6.5) * ring * (1 - np.exp(-t / 0.00032)))
    return out


def scene():
    """Near wood with a little echo from the trees, over the far sounds."""
    insects = cicadas() + trilling_cricket() + peeping_crickets() + chirping_cricket()
    handling = rustle() + knocks() + clinks()
    direct, scattered = cracks()
    near_echo = trees(volts_from_db(-12.5) * scattered + volts_from_db(-21) * handling)
    mix = direct + handling + near_echo + far_chops() + insects + bird() + rumble() + hiss()
    return mix[None]


def roll_off(x):
    """The treble ends steeply here."""
    return signal.sosfilt(signal.butter(12, 16820, fs=SR, output="sos"), x)


def record(dry):
    """The microphone cuts deep bass, lifts two treble bands and ends steeply."""
    def microphone(f):
        bass_cut = (1j * f / (1j * f + 75)) ** 2
        port = 1 + sum(resonances([peak])(f) for peak in MIC_PEAKS)
        return bass_cut * port / (1 + (f / 15900) ** 60)
    heard = filtered(dry[0], microphone)
    return roll_off(heard[None])


dry = scene()
out = record(dry)
persist_wave(out)
```